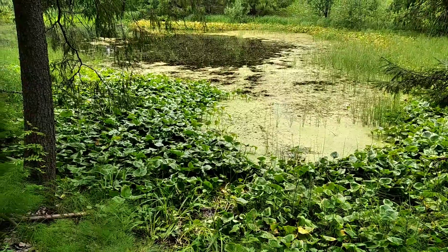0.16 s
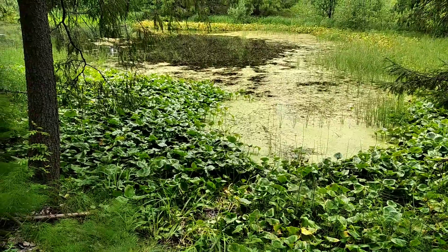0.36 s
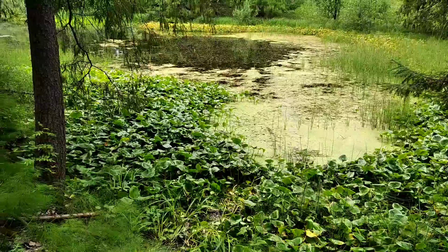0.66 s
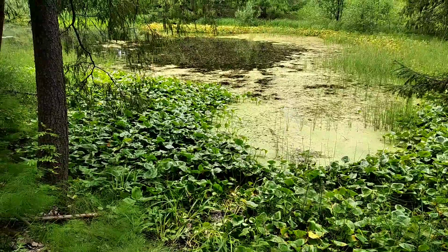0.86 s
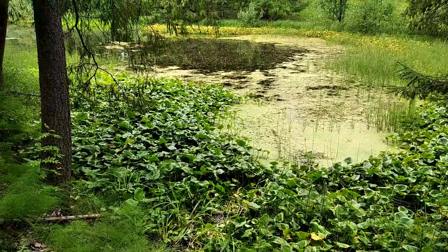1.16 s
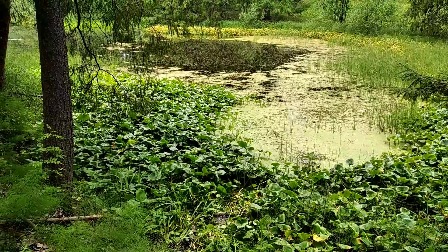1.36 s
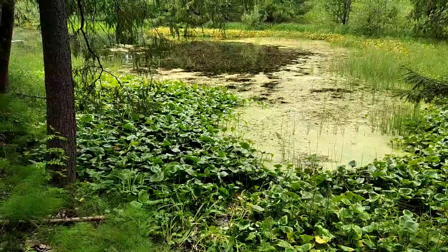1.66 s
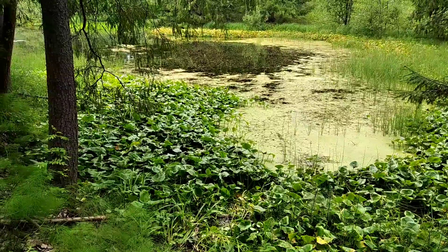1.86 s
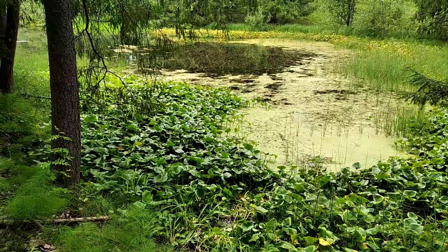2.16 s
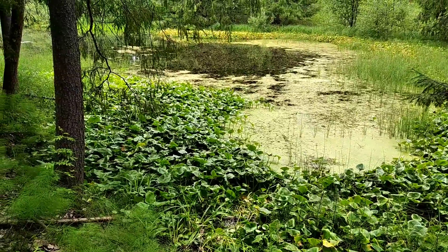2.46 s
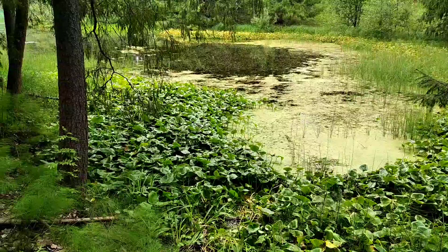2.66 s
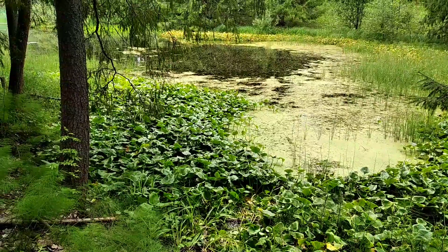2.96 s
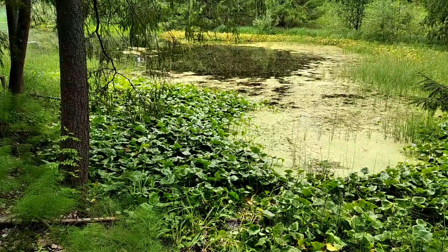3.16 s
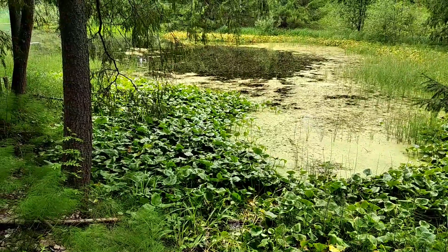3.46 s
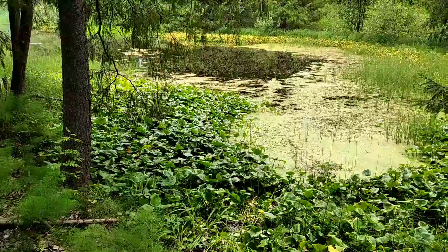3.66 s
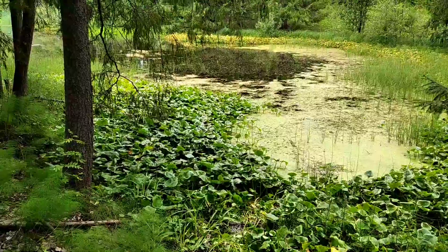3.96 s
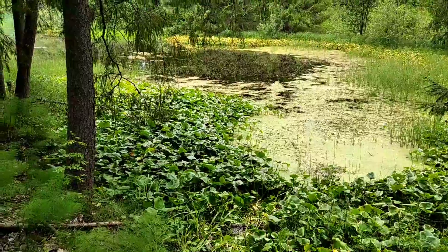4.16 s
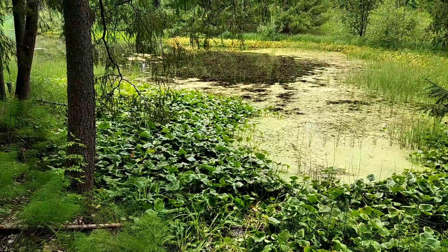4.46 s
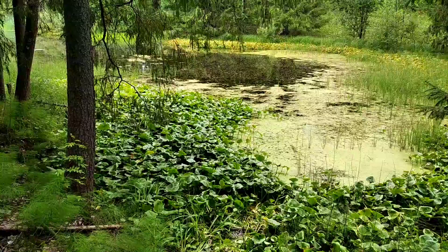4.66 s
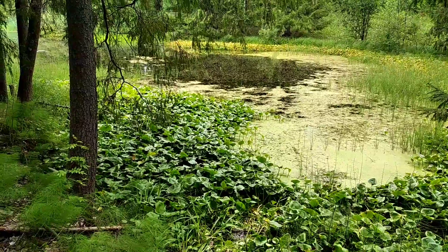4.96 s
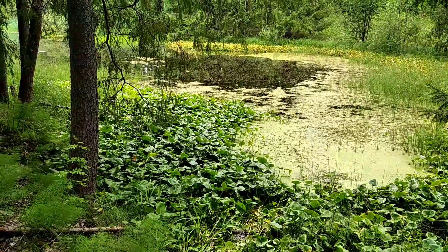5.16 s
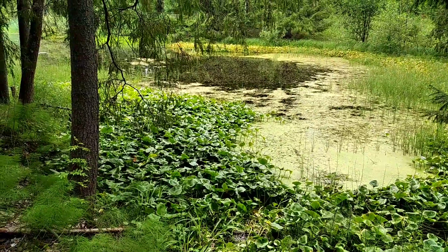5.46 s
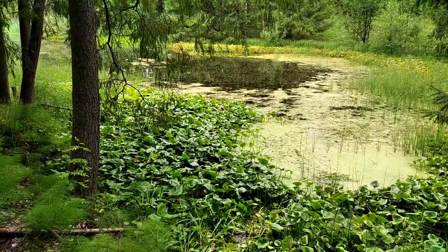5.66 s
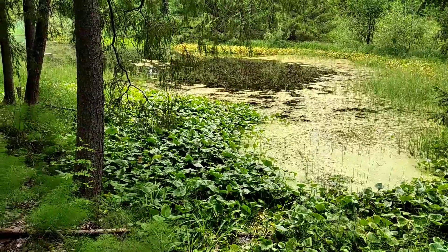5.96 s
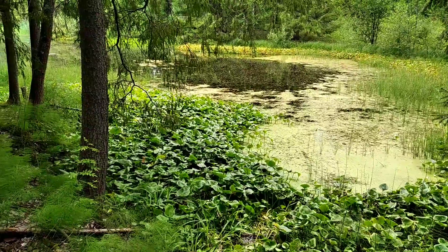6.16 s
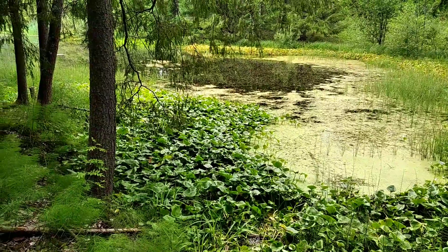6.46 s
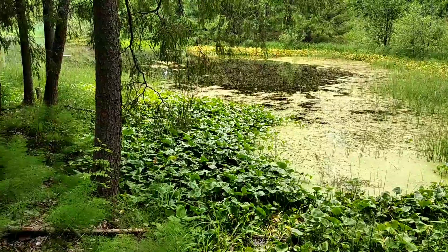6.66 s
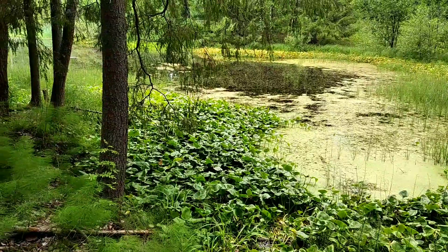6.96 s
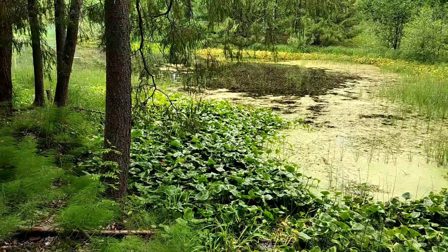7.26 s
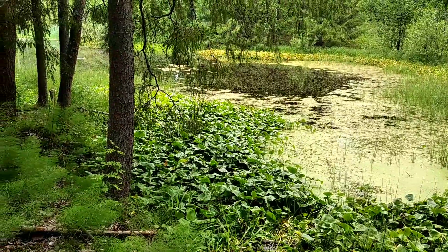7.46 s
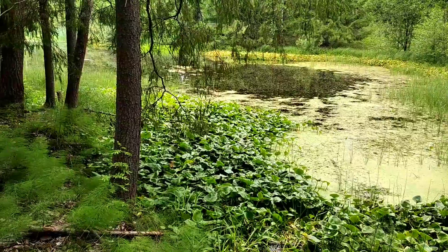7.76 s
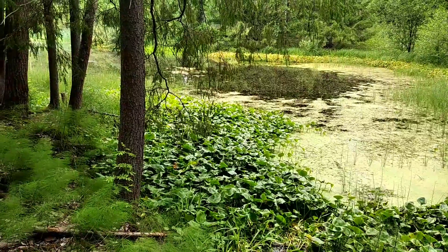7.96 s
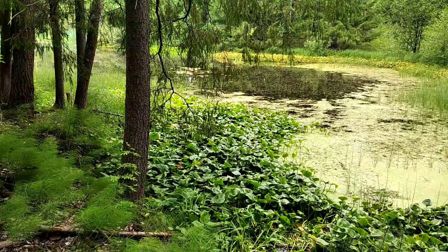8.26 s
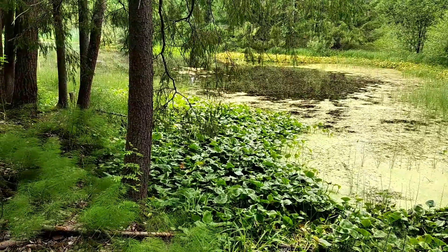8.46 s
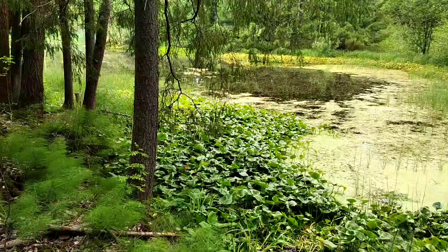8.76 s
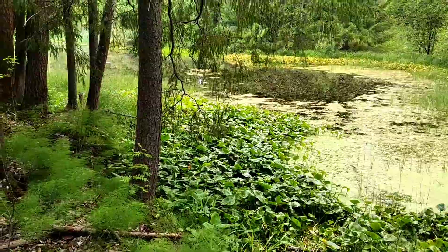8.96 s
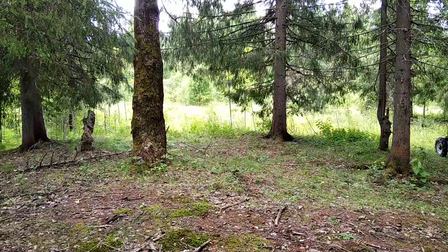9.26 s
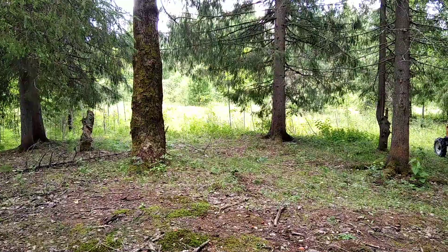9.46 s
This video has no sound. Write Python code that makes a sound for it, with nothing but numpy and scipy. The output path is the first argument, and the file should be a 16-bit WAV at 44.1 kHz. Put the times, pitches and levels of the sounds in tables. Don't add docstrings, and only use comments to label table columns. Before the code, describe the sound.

Bush crickets rasp shrilly beside a forest pond, swelling and stopping in turn, while wind thumps the microphone; a brief silence, then another spot.

```python
import sys
import numpy as np
from scipy import signal
from scipy.fft import rfft, irfft, next_fast_len
from scipy.io import wavfile
from scipy.ndimage import uniform_filter1d, map_coordinates

SR = 44100
rng = np.random.default_rng(int(sys.argv[2]) if len(sys.argv) > 2 else 0)


def gain_from_db(level_db):
    decades = np.asarray(level_db, float) / 20
    return 10 ** decades


def unload_wav(signal):
    wavfile.write(
        sys.argv[1],
        SR,
        np.round(np.clip(np.atleast_2d(signal).T, -1, 1) * 32767).astype(np.int16),
    )


N = 424241
T = np.arange(N) / SR
BACK_S = 9.15


def unit(x):
    return x / np.sqrt(np.max(np.mean(x ** 2, axis=-1)) + 1e-20)


def curves(rows, at=T):
    s, *cols = np.transpose(rows)
    return np.array([np.interp(at, s, c) for c in cols])


def swells(rows, rest_db):
    s, rise, fall, *levels = np.array(rows, float).T[..., None]
    coarse = T[::64]
    shape_db = -10 * np.maximum((s - coarse) / np.abs(rise), (coarse - s) / np.abs(fall))
    rest = gain_from_db(2 * np.asarray(rest_db))
    power = np.array([gain_from_db(2 * (db + shape_db)).sum(axis=0) for db in levels]) + rest
    return np.array([np.interp(T, coarse, 10 * np.log10(p)) for p in power])


def wobble(rate):
    knots = rng.standard_normal((2, int(N * rate / SR) + 4))
    return np.array([map_coordinates(k, [T * rate]) for k in knots])


def coloured(x, points):
    m = next_fast_len(x.shape[-1] + 4096, real=True)
    closed = [points[0][0] * .8] + [-120] * (len(points[0]) - 1)
    rows = np.array([closed, *points], float)
    log_rows = np.c_[np.log(rows[:, 0]), rows[:, 1:]]
    gain = gain_from_db(curves(log_rows, np.log(np.fft.rfftfreq(m, 1 / SR) + 1)))
    return irfft(rfft(x, m) * gain, m)[..., :x.shape[-1]]


def steady(x, span=0.14):
    width = int(span * SR / 2)
    power = uniform_filter1d(uniform_filter1d(x ** 2, width), width)
    return unit(x / np.sqrt(np.abs(power) + 1e-12))


def hush():
    # (frequency [Hz], density [dB per Hz])
    hush_hz = [(40, -13), (90, -9.5), (200, -5.5), (400, -7), (800, -11), (1400, -13), (2000, -10),
               (2600, -15.5), (4000, -16), (5600, -18.5), (7000, -25.5), (14300, -26.5)]
    # (frequency [Hz], left-right likeness [-1..1])
    alike = [(100, 0.33), (300, 0.56), (700, 0.31), (1500, -0.14), (4000, 0.035), (15000, 0)]
    level_db, new_spot_db = -72.5, 3
    z = signal.stft(rng.standard_normal((2, N)), nperseg=512)[2]
    patches = rng.standard_normal(z.shape[1:])
    patches = uniform_filter1d(uniform_filter1d(patches, 14, 0), 12, 1)
    hz = np.linspace(1, SR / 2, z.shape[1])
    like_hz, likeness = np.transpose(alike)
    turn = np.arccos(np.clip(np.interp(np.log(hz), np.log(like_hz), likeness), -1, 1)) / 2
    z = z * gain_from_db(1.0 * patches / patches.std()) * np.array([np.cos(turn), np.sin(turn)])[..., None]
    mid, side = signal.istft(z, nperseg=512)[1][:, :N]
    air = coloured(np.array([mid + side, mid - side]), hush_hz)
    return unit(air) * gain_from_db(level_db + new_spot_db * (T > BACK_S) + 1.6 * wobble(5.3)[0])


def wind():
    # (strongest [s], length [s], level [dB])
    gusts = [(0.034, 0.1, -52), (0.134, 0.104, -72), (0.268, 0.063, -52), (0.36, 0.15, -55),
             (0.431, 0.043, -46), (0.591, 0.15, -50.5), (0.736, 0.034, -50), (0.806, 0.1, -50),
             (0.886, 0.034, -48.5), (0.97, 0.071, -52), (1.032, 0.086, -51), (1.127, 0.054, -53.5),
             (1.288, 0.042, -45.5), (1.352, 0.086, -50), (1.43, 0.06, -47.5), (1.543, 0.033, -49),
             (1.705, 0.12, -65), (1.769, 0.025, -47), (1.955, 0.039, -61), (2.45, 0.068, -68),
             (2.715, 0.038, -51), (2.858, 0.082, -54), (2.927, 0.054, -42), (3.02, 0.053, -42.5),
             (3.151, 0.033, -43), (3.262, 0.038, -46.5), (3.356, 0.056, -44.5), (3.46, 0.071, -56.5),
             (3.615, 0.065, -50.8), (3.72, 0.039, -51.5), (3.83, 0.031, -52), (4.022, 0.055, -66),
             (4.372, 0.091, -48.7), (4.517, 0.11, -54.2), (4.7, 0.11, -54), (4.768, 0.076, -54.5),
             (4.853, 0.18, -55.5), (4.986, 0.098, -59), (5.085, 0.087, -60.5), (5.156, 0.073, -57.5),
             (5.241, 0.079, -51.0), (5.396, 0.066, -45.5), (5.6, 0.13, -54), (5.717, 0.11, -69),
             (5.884, 0.055, -55), (6.13, 0.085, -60), (6.444, 0.04, -58.9), (6.678, 0.071, -58.5),
             (7.486, 0.097, -65), (7.64, 0.066, -65.9), (7.803, 0.032, -54.7), (7.87, 0.081, -52),
             (7.966, 0.047, -52), (8.064, 0.086, -57.0), (8.153, 0.057, -59.5), (8.22, 0.15, -61),
             (8.457, 0.055, -56.5), (8.618, 0.06, -63), (8.865, 0.037, -63), (8.994, 0.043, -64)]
    # (strongest [s], length [s], level [dB])
    lee_gusts = [(0.049, 0.11, -71), (0.158, 0.099, -67.9), (0.22, 0.047, -61.6), (0.34, 0.045, -59),
                 (0.398, 0.11, -62), (0.49, 0.043, -71), (0.722, 0.055, -59), (0.876, 0.059, -67),
                 (0.954, 0.131, -69), (1.063, 0.053, -69.4), (1.232, 0.037, -47.5), (1.347, 0.115, -62),
                 (1.737, 0.082, -64), (1.827, 0.103, -65.1), (1.956, 0.067, -63), (2.077, 0.049, -65),
                 (2.372, 0.075, -66), (2.486, 0.067, -69), (2.597, 0.066, -67.2), (2.686, 0.04, -65.9),
                 (2.844, 0.076, -64.1), (3.49, 0.109, -66), (3.746, 0.128, -70.1), (3.878, 0.066, -69.5),
                 (4.226, 0.1, -70.1), (4.436, 0.102, -69), (4.699, 0.137, -69), (5.033, 0.059, -61),
                 (5.195, 0.116, -68.0), (5.712, 0.124, -71), (5.8, 0.102, -64), (5.887, 0.113, -62),
                 (6.007, 0.114, -68), (6.137, 0.12, -60), (6.518, 0.087, -63.7), (6.786, 0.114, -69),
                 (7.03, 0.16, -66.0), (7.131, 0.105, -71), (7.394, 0.063, -55.5), (7.49, 0.101, -65),
                 (7.663, 0.1, -72), (7.753, 0.111, -73), (8.193, 0.111, -65), (8.854, 0.095, -68.7),
                 (9.015, 0.056, -58.5)]
    calm_db = [
        [-72],
        [-73.5],
    ]
    # (frequency [Hz], left [dB], right [dB])
    rumble_hz = [(8.2, -6, -8), (25.4, 4, 10.5), (43.7, -0.5, -1.5), (88.2, -9, -6), (149.5, -29, -34),
                 (303, -53, -38), (600, -83, -86)]
    # (frequency [Hz], level [dB])
    thump_hz = [(40, -11), (85, -1), (140, -12), (260, -35.5), (500, -60)]
    # (strongest [s], rise [s], fall [s], level [dB])
    flaps = [(.48, 0.088, .04, -67), (.66, 0.099, .02, -78), (.73, .03, 0.042, -77), (.88, .05, 0.089, -88),
             (1.03, 0.03, .03, -70), (1.43, 0.29, .07, -89), (2.92, 0.02, 0.11, -71),
             (3.15, 0.08, 0.027, -69.5), (3.25, 0.02, .03, -67), (3.35, 0.013, 0.019, -66),
             (3.6, .03, 0.11, -81), (4.05, 0.1, 0.0072, -61.5), (4.13, 0.017, 0.013, -71),
             (4.38, 0.024, 0.095, -61.5), (4.8, .3, .2, -87), (5.24, .07, 0.072, -74),
             (5.47, 0.11, .04, -68), (6.96, 0.14, .08, -79)]
    # (frequency [Hz], level [dB])
    flap_hz = [(70, -19.5), (130, 2.5), (200, -4.5), (300, -13), (500, -44)]
    eddy_span = .8
    thump_db, thump_grows, thump_from_db = -10, 0.43, -52.5
    shelter_db = -5.5

    eddy_db = []
    for rows, calm in zip((gusts, lee_gusts), calm_db):
        eddies = [(s, eddy_span * length, eddy_span * length, db) for s, length, db in rows]
        eddy_db.append(swells(eddies, calm)[0])
    eddy_db = np.array(eddy_db)

    air = unit(coloured(rng.standard_normal((2, N)) * gain_from_db(3.8 * wobble(26)), rumble_hz))
    lopsided = air ** 2 - uniform_filter1d(air ** 2, 4000, axis=1)
    air = steady(air - 0.092 * lopsided, span=0.078)
    core = steady(coloured(rng.standard_normal((2, N)), thump_hz), span=.05) * gain_from_db(3.3 * wobble(40))
    air = air + gain_from_db(thump_db + thump_grows * (eddy_db - thump_from_db)) * core

    flutter = steady(coloured(rng.standard_normal((2, N)), flap_hz), span=0.056)
    flutter = flutter * gain_from_db(swells(flaps, -90.5)) * (T < BACK_S)
    return gain_from_db(eddy_db + 1.0 + shelter_db * (T > BACK_S)) * air + flutter * gain_from_db([[5], [-14]])


def rustle():
    # (loudest [s], rise [s], fall [s], level [dB])
    brush = (7, 2.7, 1, -81)
    # (frequency [Hz], level [dB])
    leaf_hz = [(1500, -11), (1900, -1), (2300, 5.5), (2700, -18)]
    grains = rng.standard_normal((2, N)) * gain_from_db(7.1 * wobble(120))
    return unit(coloured(grains, leaf_hz)) * gain_from_db(swells([brush], -120))


def ticks():
    # (time [s], peak [dB], frequency [Hz], left-right [dB])
    twigs = [
        (0.103, -60, 395, 0.0),
        (0.1468, -56.5, 406, -28),
        (7.092, -60, 2100, -5),
        (8.86, -72, 463, 2),
        (9.007, -65, 900, -9),
    ]
    out, t = np.zeros((2, N + SR)), np.arange(SR // 40) / SR
    for s, db, hz, pan_db in twigs:
        crackle = uniform_filter1d(rng.standard_normal(len(t)), size=12)
        knock = np.sin(2 * np.pi * hz * t) + 1.13 * crackle
        level_db = db + np.array([[.5], [-.5]]) * pan_db - 60 * t / 0.011
        first = round(s * SR)
        out[:, first:first + len(t)] += gain_from_db(level_db) * knock
    return out[:, :N]


def bump():
    # (time [s], left [dB], right [dB], rise [s], fall [s])
    push = (9.414, -29.5, -32.5, .035, .095)
    s, left_db, right_db, rise, fall = push
    t = np.maximum(T - s, 0)
    return gain_from_db([[left_db + 6.5], [right_db + 7.0]]) * (1 - np.exp(-t / rise)) * np.exp(-t / fall)


def rasp(beat, size, back_db=-22, grain=0.0017):
    build_s, release_s = .0031, .002
    teeth_hz, teeth_vary = 350, .12
    scrape = .28
    luck = rng.standard_normal((len(beat), 16))
    catch = rng.uniform(size=(len(beat), 1))
    tooth_rate = teeth_hz * (1 + teeth_vary * np.clip(luck[:, :1], -2, 2))
    tooth = (np.arange(-4, 3) + catch) / tooth_rate + .0001 * luck[:, 1:8]
    force = np.exp(-.5 * (tooth / np.where(tooth < 0, build_s, release_s)) ** 2)
    force = np.maximum(force, gain_from_db(back_db)) * gain_from_db(1.1 * luck[:, 8:15])
    force = force / np.linalg.norm(force, axis=1, keepdims=True)
    when = beat[:, None] + tooth + .0004 + .0003 * luck[:, 15:]
    at = np.clip(when * SR, 0, size - 1).astype(int)
    clicks = np.bincount(at.ravel(), force.ravel(), size)
    width = max(int(grain * SR), 2)
    puffs = np.abs(uniform_filter1d(uniform_filter1d(clicks, width), width))
    return unit(unit(clicks) + scrape * unit(puffs * rng.standard_normal(size)))


def trunks(x, t60=0.033):
    keep = gain_from_db(-120 / (t60 * SR))
    power = signal.lfilter([1 - keep], [1, -keep], uniform_filter1d(x ** 2, size=700))
    return np.sqrt(np.abs(power)) * rng.standard_normal((2, len(x)))


def crowd(count, voice):
    both = []
    for _ in range(2):
        singers = [(np.arange(550) + rng.uniform()) / rng.uniform(48, 54) for _ in range(count)]
        beat = np.concatenate(singers)
        both.append(rasp(beat[beat < T[-1]], N))
    return unit(coloured(np.array(both) + gain_from_db(2.0) * trunks(both[0]), voice))


def chorus():
    # (time [s], level [dB], left-right [dB])
    far_level = [(0, -52.5, 4), (.6, -53.5, 4), (2.6, -51, 2), (3.4, -53, 3), (3.8, -50, 1), (5, -53, 3),
                 (6, -52.5, 5.5), (7.3, -54, -2), (8, -51, 1), (9.05, -52, 1), (9.2, -47, 2),
                 (9.62, -51, -0.5)]
    # (frequency [Hz], left [dB], right [dB])
    far_hz = [(5540, -36.5, -39), (6410, -26, -22), (6950, -21, -17), (7390, -12.5, -7), (7920, 0, -8),
              (8220, -3.5, -6), (8480, -4.5, -11), (8500, -6, -12.5), (9970, -8.5, -11.5),
              (10270, -13.5, -17.5), (11100, -21.5, -22.5), (11700, -35, -35), (12200, -41.5, -33),
              (13800, -34, -47)]
    # (loudest [s], swell [s], fade [s], left [dB], right [dB])
    grass_songs = [(0, .3, 1.2, -63.5, -89), (1.2, 0.52, 0.59, -71, -82), (2.45, .6, 0.28, -69, -80),
                   (3.6, .06, 1.2, -65.5, -77), (4.1, .4, 0.58, -72, -74), (4.8, .6, 0.65, -78, -81),
                   (6.2, .9, 0.56, -76, -72), (8.1, .5, 0.19, -79, -71), (8.7, 0.42, 0.46, -75, -72),
                   (9.5, 0.58, .4, -64.5, -90)]
    # (frequency [Hz], left [dB], right [dB])
    grass_hz = [(9500, -29, -32), (11000, 7, 2.5), (11900, 3, -1.5), (11700, -1.5, -3), (13800, -2, -4),
                (13600, -3, 2)]
    level_db, lean_db = curves(far_level)
    sides_db = .5 * np.array([lean_db, -lean_db])
    far = crowd(count=5, voice=far_hz) * gain_from_db(level_db + sides_db + 0.43 * wobble(5.6))
    grass_db = swells(grass_songs, -90.5) + 4 + 1.2 * wobble(8.2)
    return far + crowd(count=3, voice=grass_hz) * gain_from_db(grass_db)


def strokes(t, start, stop, rate, sag, brake):
    brake_s = .2
    u = t - start
    braked = brake * brake_s * (np.exp((t - stop) / brake_s) - np.exp((start - stop) / brake_s))
    done = rate * u - sag * u ** 2 / 2 - braked
    singing = t < stop
    return np.interp(np.arange(done[singing][-1]), done[singing], t[singing])


def swelling(voice, size=1024, abrupt=0.57):
    response = coloured(signal.unit_impulse(size, "mid"), voice)
    gain = np.log(np.abs(np.fft.fft(response)) + 1e-6)
    ring = np.fft.ifft(np.exp(gain + 1j * abrupt * signal.hilbert(gain).imag)).real
    return np.roll(ring, size // 2, axis=1)


def crickets():
    # (first stroke [s], stop [s], starting rate [strokes/s], sag [strokes/s per s], final braking [strokes/s])
    songs = [
        (.0138, 2.66, 53.353, .777, 8.36),
        (1.6194, 3.34, 54.676, 2.83, 13.42),
        (3.7024, 6.555, 52.885, .583, 4.95),
        (6.5169, 8.4, 53.972, 2.34, 11.45),
        (7.815, 9.08, 53.096, .909, 0),
        (9.1588, 9.62, 50.745, 0, 0),
    ]
    # (time [s], level [dB])
    efforts = [
        [(0, -60), (.3, -54.5), (1.1, -47), (1.9, -47.5), (2.66, -50.5)],
        [(1.6, -63), (2.3, -57.5), (3.1, -52.5), (3.34, -56)],
        [(3.7, -69), (3.9, -51.5), (4.3, -43), (4.9, -37.5), (5.8, -40), (6.3, -38.5)],
        [(6.5, -61.5), (7, -61), (7.9, -56.5), (8.2, -59), (8.4, -54)],
        [(7.8, -60), (8, -52), (8.4, -46.5), (8.6, -49.5), (8.8, -44), (9.08, -42)],
        [(9.15, -56), (9.45, -60.5), (9.62, -52.5)],
    ]
    # (frequency [Hz], left [dB], right [dB])
    bright = [(5500, -52, -45), (6260, -33.5, -44.5), (7020, -44, -27.5), (7700, -19.5, -20.5),
              (7990, -6.5, -13), (8190, 0.5, -9.5), (8750, -6, -15.5), (9100, -12, -10),
              (9300, -19.5, -16.5), (10160, -10, -18), (10730, -27, -37), (11550, -20, -27),
              (11600, -35, -65), (13600, -35.5, -64)]
    broad = [(5630, -52, -40), (6500, -43, -50), (7100, -18, -24), (7650, -5, 5.5), (7820, -3, -0.5),
             (8340, 5, -20), (8340, 2.5, -18), (8860, -1, -20), (9600, -4.5, -13), (9700, -17, -20),
             (10600, -44, -32), (11800, -32, -50), (12000, -51, -44), (14100, -33, -44)]
    near = [(5450, -55, -59), (6550, -41, -54.5), (7130, -35.5, -26.5), (7690, -25.5, -34),
            (7996, -8.5, -11), (8200, 2, -9.5), (8400, -4, -13.5), (8500, 5, -10.5), (8750, -4.5, -17),
            (9040, -17.5, -31.5), (9180, -6.5, -29), (9470, -25, -17), (11600, -41.5, -44),
            (14000, -61, -54)]
    low = [(5640, -49, -49), (6600, -37, -38), (7300, -42, -18), (7470, -11, 3), (7930, 3, 3.5),
           (8030, 1, 0), (8610, -7, -26), (8930, 1, -5), (9340, -2.5, -8), (10400, -14, -15),
           (10800, -22, -21), (11800, -27, -40), (12500, -44, -46), (13900, -40, -38)]
    voices = [bright, broad, near, low, near, near]
    # (left [dB], right [dB])
    scatter_db = [(2, 3.5), (3.5, 2.5), (-6.5, -2), (3, -5), (-5.5, -3.5), (3, -2)]
    lags = [7, -4, 7, -9, 7, 12]
    lead_s = .012
    out = np.zeros((2, N + SR))
    for song, effort, voice, wet_db, lag in zip(songs, efforts, voices, scatter_db, lags):
        first = round((song[0] - lead_s) * SR)
        t = T[first] + np.arange(round((song[1] - song[0]) * SR) + SR // 5) / SR
        taut = swelling(voice)
        slack = swelling([(hz * 0.977, *levels) for hz, *levels in voice])
        wing = rasp(strokes(t, *song) - t[0], len(t))
        wing = wing * gain_from_db(curves(effort, t)[0] - 0.5) / np.linalg.norm(taut[0])
        direct = np.array([wing, np.roll(wing, lag)])
        heard = direct + gain_from_db(np.array(wet_db))[:, None] * trunks(wing)
        warm = np.clip((t - t[0]) / 1.08, 0, 1) * np.pi / 2
        for share, ring in ((np.sin(warm), taut), (np.cos(warm), slack)):
            out[:, first:first + len(t)] += signal.oaconvolve(heard * share, ring, "same", axes=1)
    return out[:, :N]


def scene():
    return hush() + wind() + rustle() + ticks() + bump() + chorus() + crickets()


def cut():
    cut_s, edge_s = 9.078, .003
    back_db, fade_s = -13, 0.13
    before = np.clip((cut_s - T) / edge_s + 1, 0, 1)
    after = np.clip((T - BACK_S) / edge_s + 1, 0, 1)
    return before + after * gain_from_db(back_db * np.exp(-np.maximum(T - BACK_S, 0) / fade_s))


def roll_off(x):
    return signal.sosfilt(signal.butter(12, 15280, fs=SR, output="sos"), x)


def record(dry):
    top_hz = 14400
    dry = coloured(dry, [(0.001, 0), (top_hz - 100, 0), (top_hz + 30, -70), (SR / 2, -110)])
    return roll_off(dry * cut())


dry = scene()
out = record(dry)
unload_wav(out)
```